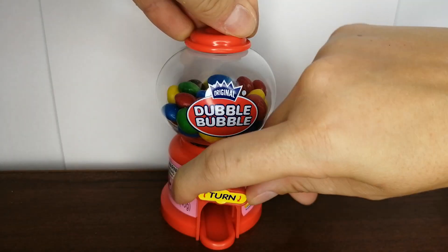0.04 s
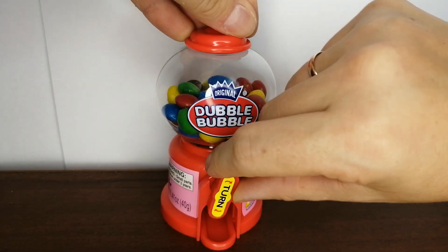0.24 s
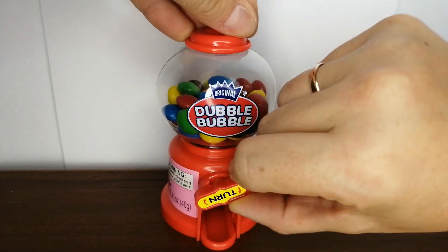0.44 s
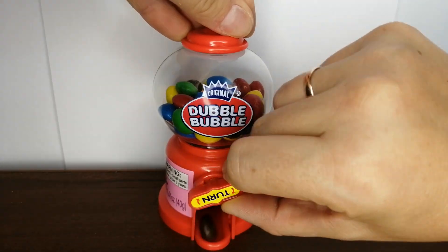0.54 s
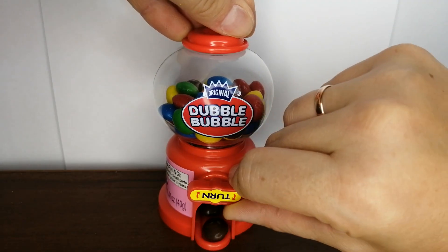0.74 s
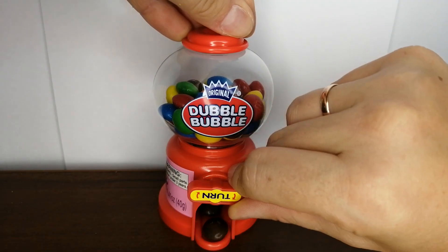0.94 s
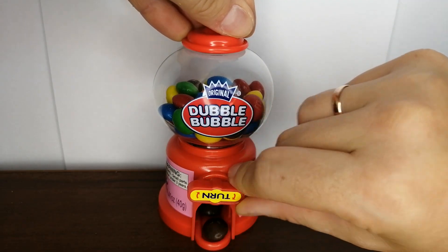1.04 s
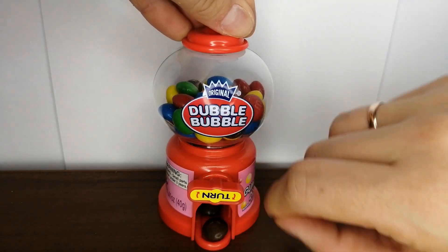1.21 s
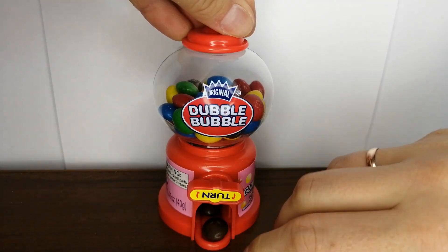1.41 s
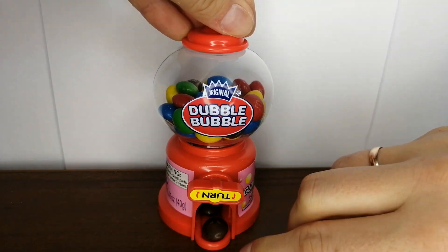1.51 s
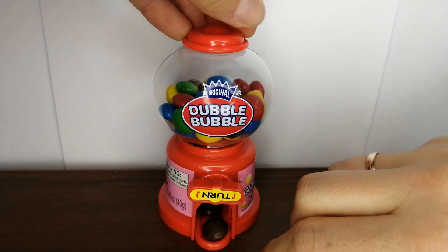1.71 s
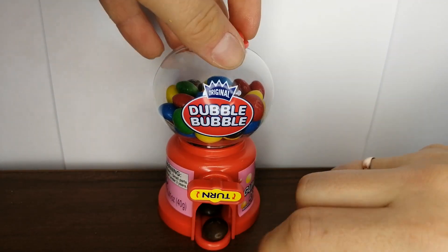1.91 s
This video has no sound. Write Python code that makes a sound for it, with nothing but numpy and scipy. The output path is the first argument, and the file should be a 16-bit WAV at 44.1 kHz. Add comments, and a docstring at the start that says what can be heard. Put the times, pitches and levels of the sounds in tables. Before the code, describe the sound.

Close stereo pickup of a toy candy machine: two dense bursts of bright plastic clicks and candy rattle, near silence with small hollow taps, then a dull table bump, faint skin rub and last ticks.

```python
"""The wheel of a small plastic candy dispenser catches and slips as its knob is turned in two pushes.
Candies rattle against the shell, which resonates; two late knocks sound in the hollow chute.
Then the hand comes down on the wooden table and fingers slide off the lid with a last tick.
Impacts are noise bursts and decaying modes, friction is grainy noise, and a quiet room adds its tail."""
import sys
import numpy as np
from scipy import signal
from scipy.fft import rfft, irfft, next_fast_len
from scipy.io import wavfile

SR = 44100
rng = np.random.default_rng(int(sys.argv[2]) if len(sys.argv) > 2 else 0)


def transcribe(u):
    """Save the signal u as a 16-bit wav file named by the first command-line argument.

    u: samples, shape (n,) or (channels, n), limited to [-1, 1]; the rate is SR.
    q: integer samples, one column per channel.
    """
    v = np.clip(np.atleast_2d(u).T, -1, 1)
    q = np.round(v * 32767).astype(np.int16)
    wavfile.write(sys.argv[1], SR, q)


N = 85995
T = np.arange(N) / SR   # time in seconds

# Catches of the wheel and candies striking the shell, before the shell's colour and lean.
# Each row: start in seconds, level in dB, bass and treble in dB against the middle band (where the
# usual values below mean no change), left-right balance in dB, ring frequency in Hz.
CLICKS = [(0.0631, -63, 5, -17, 4.5, 2530), (0.0898, -41.5, -8.5, -11, 3, 8650),
          (0.1038, -45, -9, -4.5, 5, 2340), (0.1126, -50, 2.5, -21, 0.5, 2560),
          (0.14, -73, 10, -16, 0, 1970), (0.157, -66, 8.5, -17, 2, 2000),
          (0.1976, -40.5, -10, -19, 6.5, 3610), (0.2194, -32.5, -3, -22, 3, 2620),
          (0.2222, -34, -3.5, -16, 3, 8750), (0.2367, -34.5, 0.5, -10, 4, 2600),
          (0.2457, -24, -18, -26, 11.5, 2580), (0.2487, -26.5, -10.5, -9, 4.5, 8340),
          (0.2605, -32.5, -8.5, -6, -6, 9140), (0.2757, -38.5, -6, -1.5, 8, 2900),
          (0.2814, -38, 3.5, -14, 0, 6900), (0.2913, -31.5, -13.5, -5, 9, 8440),
          (0.2953, -28.5, -1, -10, 5, 2400), (0.3011, -37, -12, -3, -3, 8500),
          (0.3079, -36, -4, -15, 4, 3570), (0.3184, -34.5, -10.5, -3, 3.5, 9700),
          (0.332, -27.5, -11.5, -18, 7.5, 7110), (0.3511, -27, -11, -7, 3, 8560),
          (0.3586, -32.5, -9, -15, 14, 6420), (0.3778, -34.5, -8, -26, -3.5, 5280),
          (0.3946, -42, -10.5, -6, 4, 8740), (0.4518, -43.5, -6.5, -25, -1.5, 2400),
          (0.4799, -31, -17, 0.5, 4, 7070), (0.4852, -32.5, -5.5, -23, -5, 7550),
          (0.498, -36.5, -8.5, -10, -4.5, 5370), (0.508, -37, -5.5, -9, 4, 2900),
          (0.5535, -28.5, -7.5, -9, 0, 6920), (0.5618, -28.5, -10, -16, 3.5, 7260),
          (0.5699, -23.5, -6.5, -9.5, 4.5, 8050), (0.577, -28.5, -11, -11, 3, 5580),
          (0.584, -30.5, -9, -9, 11, 8340), (0.588, -32, -1.5, -15.5, -2.5, 8400),
          (0.607, -30, -5.5, -12, -4, 7110), (0.6099, -37.5, -8, -3.5, 0, 7000),
          (0.6175, -35, -3.5, -6.5, -1, 4700), (0.628, -38, -3, -12, 2, 4650),
          (0.6371, -39, -5.5, -14, -7, 3850), (0.6572, -32, -11.5, -9.5, -5, 3690),
          (0.6623, -29.5, -16.5, -13, 8, 3700), (0.6825, -38, -7, -17, 5, 3730),
          (0.6956, -28.5, -9.5, -7.5, -0.5, 5800), (0.7042, -46.5, 4.5, -5, -8.5, 4800),
          (0.7195, -39.5, -5, -21, -3, 3550), (0.7327, -25.5, -13, -3.5, -0.5, 6300),
          (0.7406, -19.5, -27, -13.5, 0, 6260), (0.7476, -23, -27, -9.5, 5, 6420),
          (0.7646, -23.5, -8, -2.5, -3.5, 6420), (0.7741, -25, -12.5, -12, -4, 6480),
          (0.779, -27.5, -18, -15, -6, 6230), (0.7851, -21, -14, -4, 0.5, 6520),
          (0.7989, -37.5, -2.5, -10, 1, 6430), (0.807, -27, -26, -19, 3, 6330),
          (0.811, -30, -16, -18, -6.5, 3490), (0.8205, -30, -23.5, -17, 1, 3460),
          (0.8521, -39, -3.5, -19, -5.5, 5450), (0.8659, -46, 1, -25, -3, 5470)]
BASS_EDGE_HZ, TREBLE_EDGE_HZ, USUAL_BASS_DB, USUAL_TREBLE_DB = 1860, 8250, -9.5, -12
CRACK_GAIN_DB = 0.5   # added to the level of the cracks only
CLICK_RISE_S, CLICK_T60_S = 0.0015, 0.021
BASS_T60_S, BASS_SPREAD = 0.03, 0.4
PING_DB, PING_RISE_S, PING_T60_S = -3.5, 0.0015, 0.021   # level relative to the click's own

# Broad colour of the plastic shell. Each row: frequency in Hz, gain in dB.
SHELL_COLOUR = [(50, -33), (130, -16), (330, -11), (520, -6.5), (750, -3.5), (950, -2), (1250, -2),
                (1700, 1), (3000, 0), (4700, -2.5), (7000, 3.5), (8700, -3.5), (11000, -10), (15000, -17),
                (16500, -28)]
# Ringing modes of the shell. Each row: frequency in Hz, gain in dB, decay time T60 in seconds.
SHELL_MODES = [(758, 4, 0.045), (1222, 10, 0.033), (2575, 6, .09), (2664, 6, 0.027), (3010, -1, .06),
               (3490, 7.5, 0.21), (4216, 4, 0.027), (5480, 7.5, 0.051), (6245, -9.5, .11),
               (6430, 5.5, 0.076), (7130, -15, .06), (7800, 1.5, .04), (8500, -1, .04)]
# Stereo lean of the dispenser. Each row: frequency in Hz, left-right balance in dB before lean() shares it.
DISPENSER_LEAN = [(120, 5.5), (330, -9), (500, 7), (800, -4.5), (1800, -4.5), (2800, -2), (6400, -4.5),
                  (9800, 8), (15000, -14.5)]
RIGHT_DELAY_S, CLOSE_SPREAD = 0.00014, 0.89

# Candies grinding during each push. Each row: time in seconds, level in dB before the shell.
GRIND_LEVEL = [(.175, -81), (.215, -51), (.225, -43), (.26, -40.5), (.32, -44.5), (.37, -37), (.395, -56),
               (.415, -78), (.548, -68), (.56, -35), (.585, -37), (.63, -48.5), (.68, -53.5), (.728, -55.5),
               (.745, -39.5), (.815, -41.5), (.865, -49.5), (.89, -76)]
GRAINS_PER_S, GRAIN_SPREAD_DB, GRAIN_T60_S = 900, 2.5, 0.0067

# Knocks in the chute. Each row: start in seconds, ring in dB, crack in dB before colour, swell in seconds.
KNOCKS = [(0.9902, -45, -44.5, 0.005), (1.2840, -38.5, -32.5, 0.00125)]
KNOCK_RISE_S, KNOCK_T60_S = 0.002, 0.02
# Colour of the chute's cracks. Each row: frequency in Hz, gain in dB.
CHUTE_COLOUR = [(100, -23), (450, -8), (900, -7), (1300, -9), (2000, 1), (2700, 6), (3400, 0), (4300, -2),
                (5200, -7), (6800, -2.5), (9500, -22.5), (15000, -39)]
# Modes of the chute. Each row: frequency in Hz, level in dB, decay time T60 in seconds.
CHUTE_MODES = [(1226, 2.5, 0.024), (1296, -3, .025), (1888, -3.5, 0.027), (3670, -4, .03),
               (6090, -18.5, 0.029)]

# Skin sliding on table and lid. Each row: time in seconds, level in dB before colour.
RUB_LEVEL = [(1.53, -87), (1.57, -60), (1.615, -62.5), (1.66, -79), (1.79, -79), (1.82, -65),
             (1.845, -51.5), (1.88, -57.5), (1.91, -54.5), (1.945, -110)]
# Colour of the sliding. Each row: frequency in Hz, gain in dB.
RUB_COLOUR = [(100, 16.5), (420, 14.5), (800, 8), (1200, 0), (1700, 4.5), (2300, -2.5), (3300, 7),
              (4300, -6.5), (7000, -3), (10000, -19), (15000, -19)]
RUB_GRAINS_PER_S, RUB_GRAIN_T60_S = 2200, 0.028
LID_SNAP_S, LID_SNAP_DB = 1.902, -41.5
# Modes of the lid. Each row: frequency in Hz, level in dB, decay time T60 in seconds.
LID_MODES = [(2370, 0.5, .04), (2430, -7, .025), (4000, 0, 0.028), (4200, -13, 0.024), (6320, -6.5, 0.017),
             (8080, -2.5, 0.015)]

# The dispenser's foot and then the hand bump the table.
# Each row: start in seconds, thud in dB, tick in dB before colour.
BUMPS = [(0.2239, -50.5, -68), (0.2472, -50.5, -70), (0.293, -54.5, -67), (0.356, -54, -70),
         (0.574, -53, -70), (0.761, -52.5, -45.5), (1.5129, -39, -43.5), (1.5264, -68, -75),
         (1.5928, -48, -49.5), (1.652, -55.5, -79), (1.842, -49.5, -54), (1.864, -46, -56),
         (1.896, -48, -41), (1.9022, -46.5, -39.5), (1.919, -65, -79)]
# Modes of the wooden table. Each row: frequency in Hz, level in dB, decay time T60 in seconds.
TABLE_MODES = [(108.6, 0, 0.14), (166.5, -6.5, 0.089), (200, -3, .05), (404, -10.5, 0.13),
               (732, -11.5, 0.051)]
TABLE_RISE_S, TABLE_LOW_CUT_HZ = 0.0006, 51
# Colour of the ticks. Each row: frequency in Hz, gain in dB.
TICK_COLOUR = [(200, 8.5), (1100, -7.5), (1650, -0.5), (2400, 5.5), (3600, 6), (4300, -2.5), (5400, 4.5),
               (8000, -4.5), (10000, -6.5), (15000, -21)]
TICK_RISE_S, TICK_T60_S = 0.001, 0.018
# Low handling rumble. Each row: time in seconds, level in dB before colour.
RUMBLE_LEVEL = [(0, -82), (.92, -82), (1.02, -70), (1.14, -78.5), (1.28, -64.5), (1.49, -68.5),
                (1.52, -51.5), (1.68, -63), (1.78, -59.5), (1.86, -58.5), (1.95, -64)]
# Colour of the rumble. Each row: frequency in Hz, gain in dB.
RUMBLE_COLOUR = [(15, 26.5), (32, 23), (70, 14.5), (120, 19), (250, 10), (600, -7.5), (2000, -38.5)]

ROOM_DB, ROOM_DELAY_S, ROOM_SPLIT_HZ = -17, 0.015, 6700
ROOM_T60_S, ROOM_TREBLE_T60_S = 0.2, 0.13
# Colour and level of the room tone. Each row: frequency in Hz, gain in dB.
ROOM_TONE_COLOUR = [(15, -63.5), (32, -40.5), (65, -54.5), (115, -43), (170, -53.5), (350, -51.5),
                    (700, -58.5), (1500, -66.5), (4000, -74.5), (6000, -73), (10000, -78.5), (15500, -73.5)]
# Stereo lean of the room tone. Each row: frequency in Hz, left-right balance in dB before lean() shares it.
ROOM_TONE_LEAN = [(60, -8.5), (500, -5.5), (5000, -7.5), (15000, -1.5)]
CUTOFF_HZ = 16200


def wheel_clicks():
    """Impact spectra: each catch excites bass, middle and treble bands in its own proportion."""
    times, db, bass_db, treble_db, pan_db, _ = np.transpose(CLICKS)

    def gains(extra_db):
        event_db = db + CRACK_GAIN_DB + extra_db
        return from_db(event_db[:, None] + np.outer(pan_db, [0.5, -0.5]))

    bass = contacts(times, gains(bass_db - USUAL_BASS_DB), CLICK_RISE_S, BASS_T60_S, BASS_SPREAD)
    middle = contacts(times, gains(0), CLICK_RISE_S, CLICK_T60_S)
    treble = contacts(times, gains(treble_db - USUAL_TREBLE_DB), CLICK_RISE_S, CLICK_T60_S)
    bass = split(bass, BASS_EDGE_HZ)[0]
    middle = split(split(middle, BASS_EDGE_HZ)[1], TREBLE_EDGE_HZ)[0]
    treble = split(treble, TREBLE_EDGE_HZ)[1]
    return bass + middle + treble


def grinding():
    """Granular friction: candies shifting against each other make many tiny contacts in each push."""
    return level(GRIND_LEVEL) * grains(GRAINS_PER_S, GRAIN_T60_S)


def pings():
    """Local resonance: each click also rings briefly at a pitch set by where it lands."""
    out = np.zeros((2, N))
    for start, db, _, _, pan_db, hz in CLICKS:
        out += pan(ring(start, db + PING_DB, [(hz, 0, PING_T60_S)], PING_RISE_S), pan_db)
    return out


def dispenser():
    """Forced resonance: clicks and grinding drive the modes of the shell, and the pings are added."""
    shell = colour(resonate(wheel_clicks() + grinding(), SHELL_MODES), SHELL_COLOUR)
    return lean(shell + pings(), DISPENSER_LEAN)


def chute():
    """Cavity resonance: the knocks at the outlet combine dull cracks with hollow, decaying modes."""
    times, _, crack_db, _ = np.transpose(KNOCKS)
    cracks = colour(contacts(times, from_db(crack_db), KNOCK_RISE_S, KNOCK_T60_S), CHUTE_COLOUR)
    hollow = sum(ring(start, db, CHUTE_MODES, swell_s) for start, db, _, swell_s in KNOCKS)
    return pan(cracks + hollow, -4)


def hand():
    """Friction and release: skin slides in tiny contacts, and the lid snaps as the fingers let go."""
    rub = colour(level(RUB_LEVEL) * grains(RUB_GRAINS_PER_S, RUB_GRAIN_T60_S), RUB_COLOUR)
    snap = ring(LID_SNAP_S, LID_SNAP_DB, LID_MODES, TICK_RISE_S)
    return pan(rub + snap, -4)


def table_top():
    """Plate modes: bumps thud in the wood, each with a light tick, over a low handling rumble."""
    times, _, tick_db = np.transpose(BUMPS)
    thuds = -sum(ring(start, db, TABLE_MODES, TABLE_RISE_S) for start, db, _ in BUMPS)
    thuds = split(thuds, TABLE_LOW_CUT_HZ)[1]
    rumble = colour(level(RUMBLE_LEVEL) * stereo_noise(0.2), RUMBLE_COLOUR)
    ticks = colour(contacts(times, from_db(tick_db), TICK_RISE_S, TICK_T60_S), TICK_COLOUR)
    return pan(thuds + rumble, -8.5) + pan(ticks, -3)


def room(x, size=20000):
    """Reverberation: a short, diffuse, exponentially decaying tail whose treble dies first."""
    age = np.arange(size) / SR
    low, high = split(rng.standard_normal((2, size)), ROOM_SPLIT_HZ)
    tail = low * from_db(-60 * age / ROOM_T60_S) + high * from_db(-60 * age / ROOM_TREBLE_T60_S)
    tail *= age > ROOM_DELAY_S
    tail /= np.sqrt(np.sum(tail ** 2) / 2)   # unit energy per side, on average
    return from_db(ROOM_DB) * signal.fftconvolve(x, tail, axes=1)[:, :N]


def room_tone(shared_below_hz=450):
    """Spatial coherence: faint rumble largely common to both sides lies under a diffuse hiss."""
    rumble = split(stereo_noise(0.4), shared_below_hz)[0]
    hiss = split(stereo_noise(1), shared_below_hz)[1]
    return lean(colour(rumble + hiss, ROOM_TONE_COLOUR), ROOM_TONE_LEAN)


def from_db(db):
    """Logarithmic level: decibels become an amplitude gain."""
    return 10 ** (np.asarray(db) / 20)


def level(curve):
    """Envelope: (s, dB) points, joined linearly in dB, give the gain over time."""
    return from_db(np.interp(T, *np.transpose(curve)))


def pan(x, pan_db):
    """Level difference: positive dB favours the left side, split evenly between the two."""
    return x * from_db([[pan_db / 2], [-pan_db / 2]])


def colour(x, points, share=1):
    """Minimum phase: a causal filter follows (Hz, dB) points, the dB scaled by share."""
    size = 2 * next_fast_len(N)
    hz, db = np.transpose(points)
    bins_hz = np.arange(size // 2 + 1) * SR / size
    gain_db = share * np.interp(np.log(bins_hz + 1), np.log(hz), db)
    # Folding the cepstrum onto positive time makes the response causal.
    cepstrum = irfft(np.log(from_db(gain_db)))[:size // 2]
    cepstrum[1:] *= 2
    return irfft(rfft(x, size) * np.exp(rfft(cepstrum, size)))[..., :N]


def lean(x, points):
    """Level difference by frequency: 0.48 of the dB goes to the left, -0.33 to the right."""
    return np.array([colour(x[0], points, 0.48), colour(x[1], points, -0.33)])


def split(x, hz):
    """Band division: return the parts below and above a frequency."""
    parts = []
    for kind in ("low", "high"):
        section = signal.butter(2, hz, kind, fs=SR, output="sos")
        twice = np.tile(section, (2, 1))
        parts.append(signal.sosfilt(twice, x + 1e-18))
    return parts


def stereo_noise(spread, size=N):
    """Partial coherence: white noise has a shared part and a part opposed between the sides."""
    shared, apart = rng.standard_normal((2, size))
    return np.array([shared + spread * apart, shared - spread * apart]) / np.hypot(1, spread)


def contacts(times, gains, rise_s, t60_s, spread=CLOSE_SPREAD, size=4000):
    """Dense modes: each contact is a noise burst that dies fast; gains are per event, or event and side."""
    out = np.zeros((2, N + size))
    age = np.arange(size) / SR
    shape = np.minimum(age / rise_s, 1) * from_db(-60 * np.maximum(age - rise_s, 0) / t60_s)
    for time, gain in zip(times, gains):
        crack = stereo_noise(spread, size=size) * shape
        crack *= np.sqrt(2 * np.sum(shape ** 2) / np.sum(crack ** 2))   # same energy every time
        start = int(time * SR)
        out[:, start:start + size] += np.reshape(gain, (-1, 1)) * crack
    return out[:, :N]


def grains(per_s, t60_s):
    """Shot noise: random contacts, each decaying in power, modulate noise to an rms of about 1."""
    sizes_db = GRAIN_SPREAD_DB * np.minimum(rng.exponential(1, N), 4)
    sizes = from_db(sizes_db) * (rng.random(N) < per_s / SR)
    power_decay = np.exp(-2 * np.log(1000) / (t60_s * SR))
    power = signal.lfilter([1], [1, -power_decay], sizes ** 2 + 1e-18)
    return np.sqrt(power / power.mean()) * stereo_noise(CLOSE_SPREAD)


def resonate(x, modes):
    """Sympathetic resonance: narrow two-pole modes are added to the direct sound."""
    out = x.copy()
    for hz, db, t60 in modes:
        r = np.exp(-np.log(1000) / (t60 * SR))   # pole radius
        zeros = np.array([1, 0, -1]) * (1 - r * r) / 2
        poles = [1, -2 * r * np.cos(2 * np.pi * hz / SR), r * r]
        out += from_db(db) * signal.lfilter(zeros, poles, x + 1e-18)
    return out


def ring(start, db, modes, rise_s):
    """Free vibration: one blow sets modes ringing, which swell while the contact lasts, then decay."""
    age = np.maximum(T - start, 0)
    swell = np.minimum(age / rise_s, 1)
    out = np.zeros(N)
    for hz, mode_db, t60 in modes:
        decay_db = -60 * np.clip(age - rise_s, 0, 3 * t60) / t60
        out += from_db(db + mode_db + decay_db) * swell * np.sin(2 * np.pi * hz * age)
    return out


def microphones(x):
    """Time difference: the sound reaches the right side a little later."""
    return np.array([x[0], np.interp(T - RIGHT_DELAY_S, T, x[1])])


def scene():
    """Superposition: the close sources, their reverberation and the room tone add together."""
    close = microphones(dispenser() + chute() + table_top() + hand())
    return close + room(close) + room_tone()


def record(dry):
    """Band limit: a steep elliptic low-pass removes the top."""
    return signal.sosfilt(signal.ellip(10, 0.1, 70, CUTOFF_HZ, fs=SR, output="sos"), dry)


dry = scene()
out = record(dry)
transcribe(out)
```